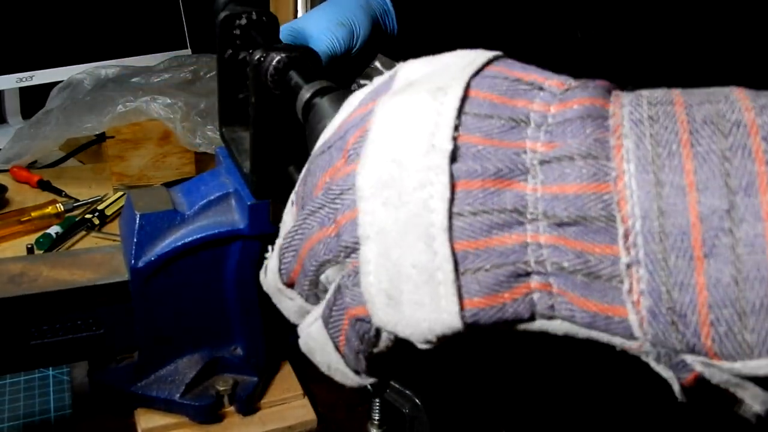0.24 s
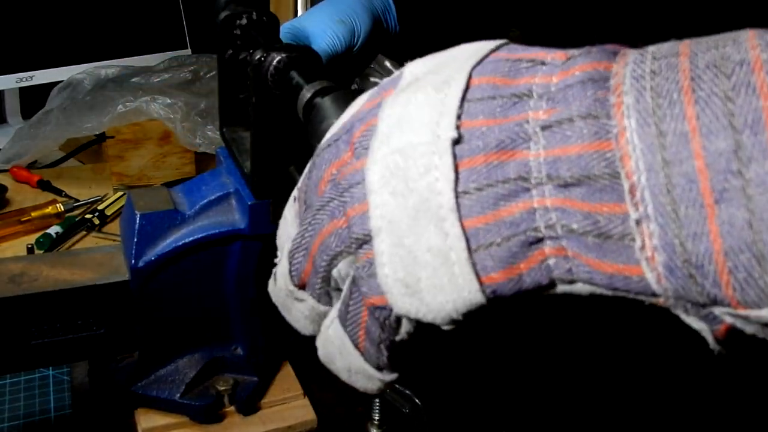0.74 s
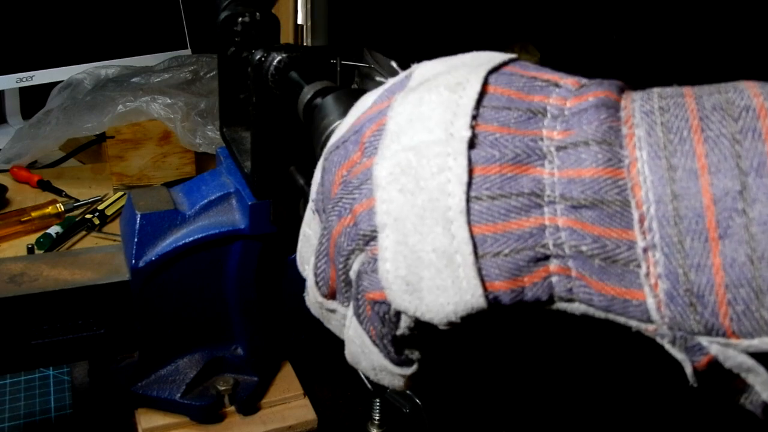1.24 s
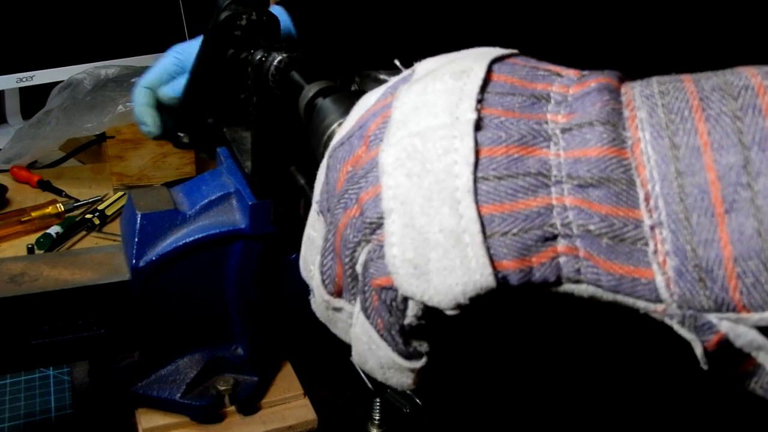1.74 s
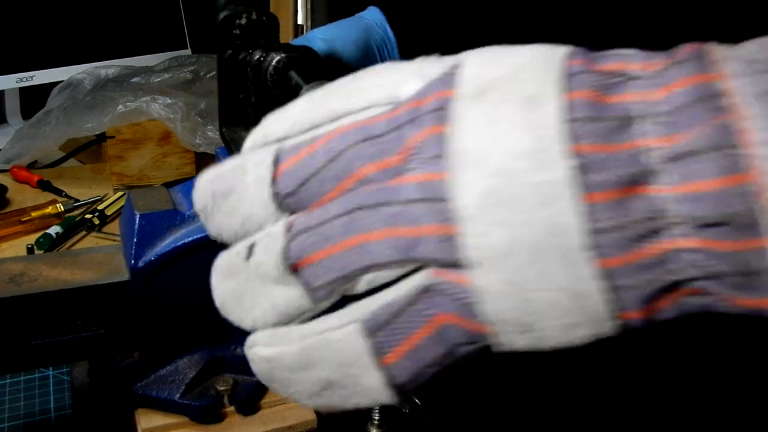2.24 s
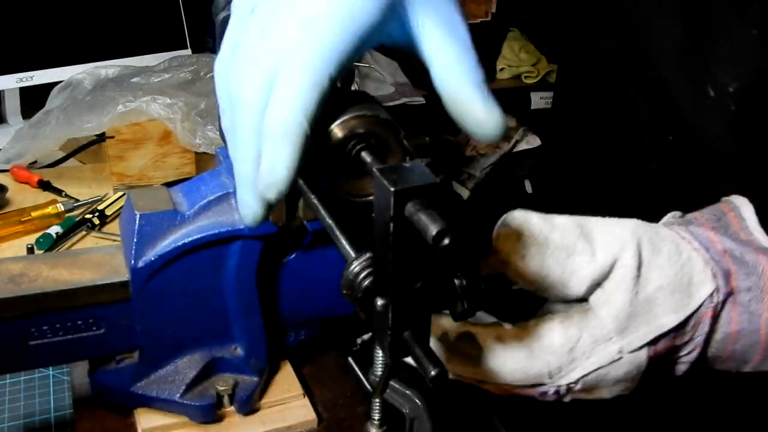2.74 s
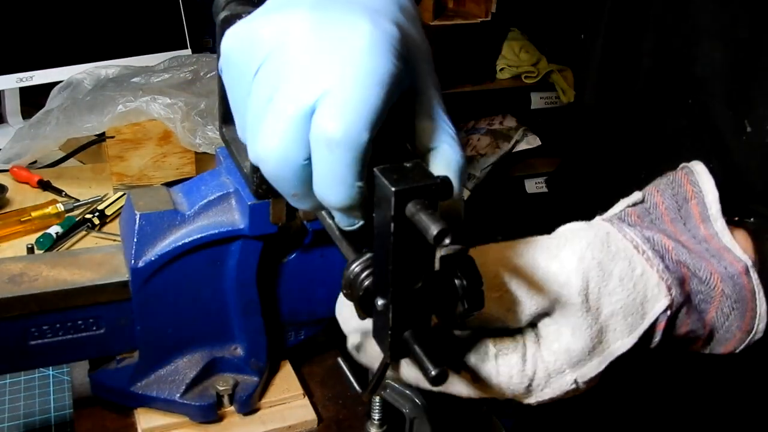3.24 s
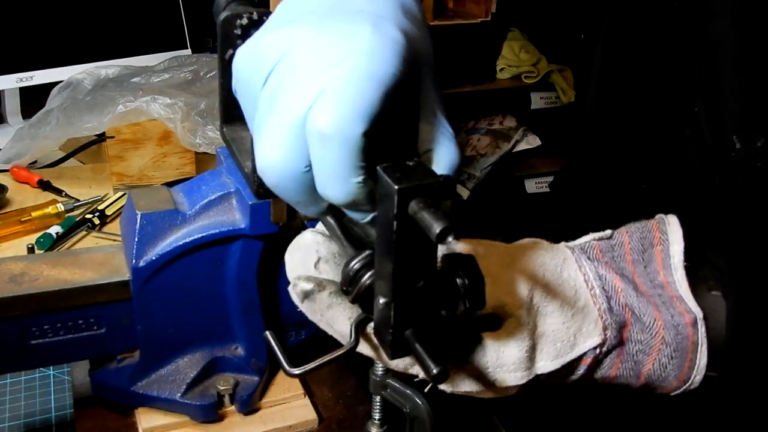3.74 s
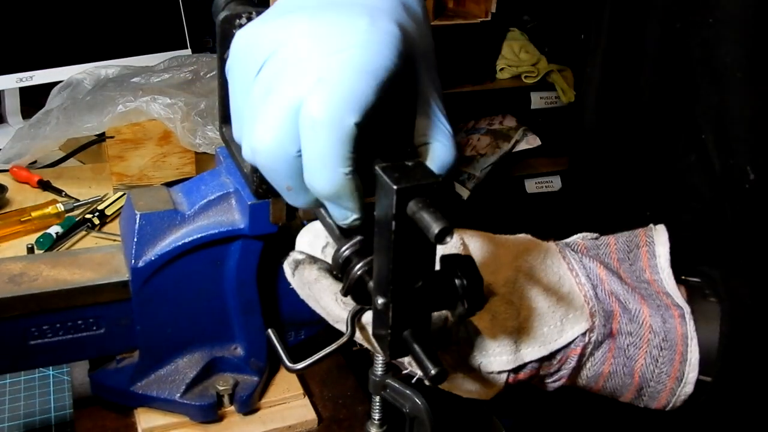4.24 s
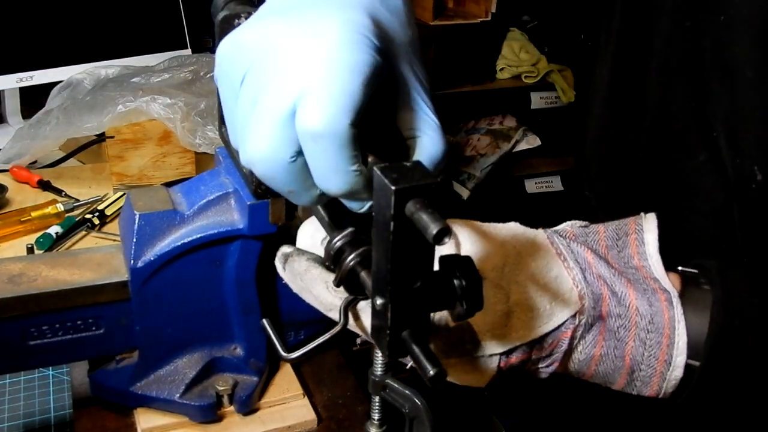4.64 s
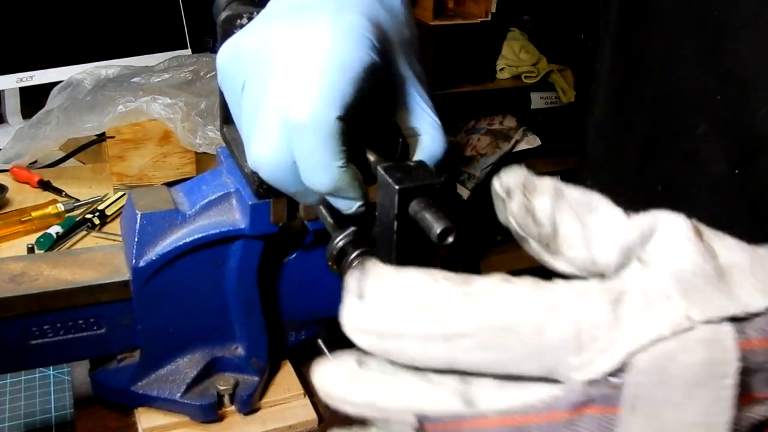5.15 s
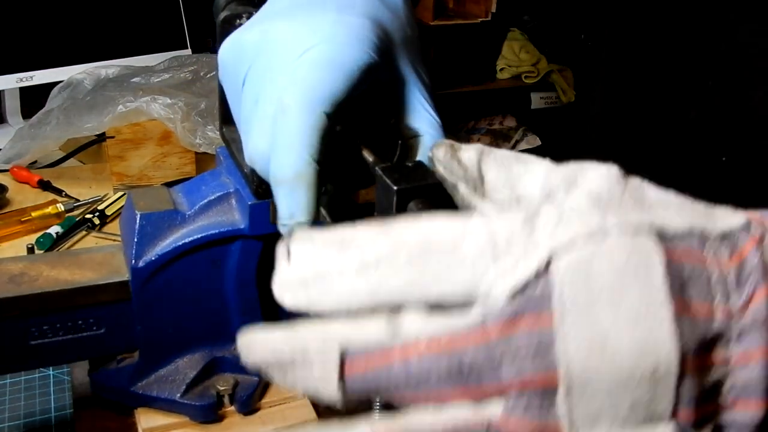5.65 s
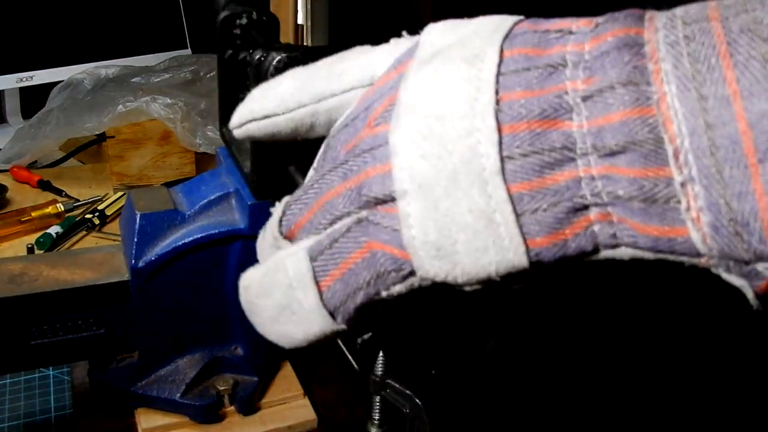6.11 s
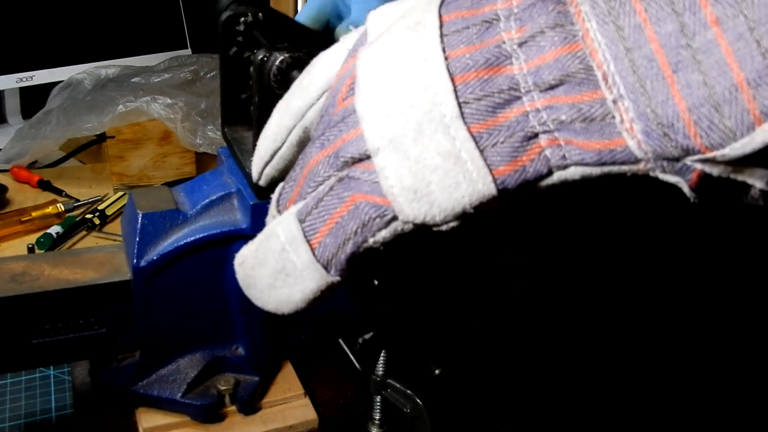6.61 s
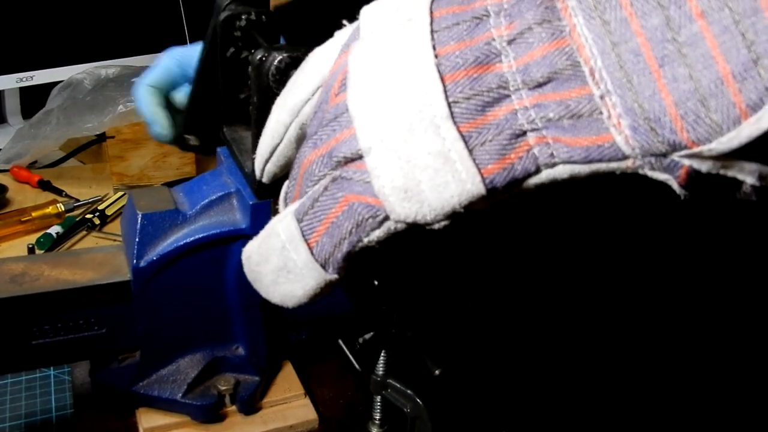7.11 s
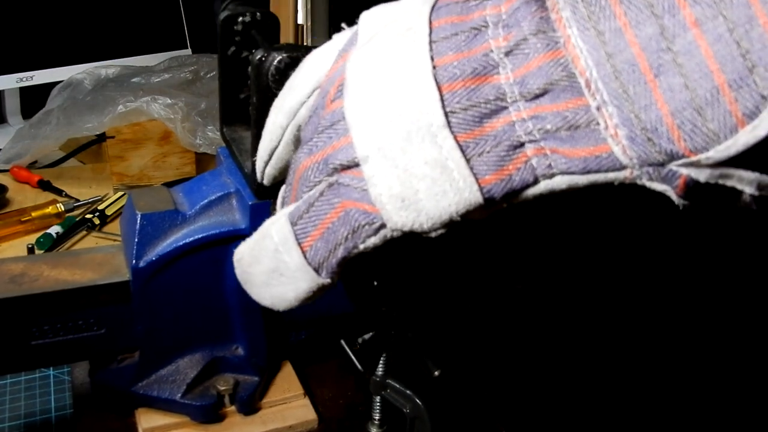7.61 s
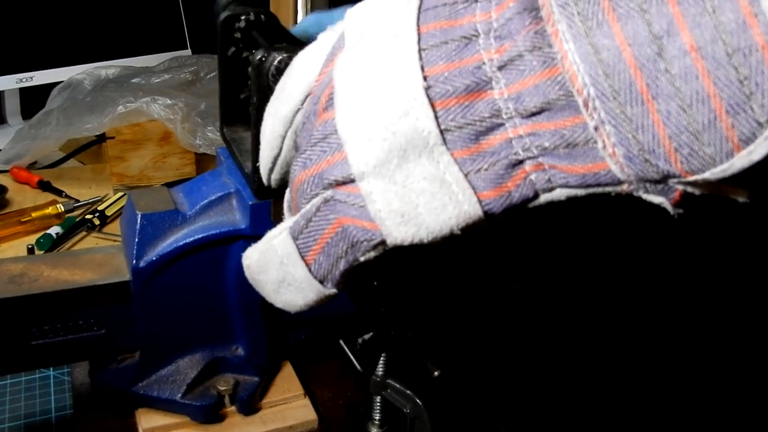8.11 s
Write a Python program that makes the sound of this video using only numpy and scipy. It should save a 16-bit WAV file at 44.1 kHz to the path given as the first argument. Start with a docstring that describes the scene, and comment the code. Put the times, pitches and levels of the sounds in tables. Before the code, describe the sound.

Close in a small workshop, a hand-cranked spring winder clicks through about ten steel ratchet teeth, then stops with a clack. Gloves rustle, loose parts tick and a shaft groans softly. A second, faster and louder run of clicks follows, broken by a hard metallic snap, then slower clicks and a final snap.

```python
"""A spring winder clamped to a workshop bench is cranked in two runs: its steel pawl scrapes, drops and chatters
from tooth to tooth (damped modes plus noise bursts), and three times the ratchet snaps hard (dense noise bursts).
Loose parts clack and tick, the bearing and twisted shaft groan, the clamp knocks, gloves rustle, the bench booms
(all shaped noise). The room is small, with air noise, hum and whine; sharp loud clicks pull the gain down, and
it slowly comes back."""
import sys
import numpy as np
from scipy import signal
from scipy.fft import rfft, irfft, next_fast_len
from scipy.io import wavfile
from scipy.ndimage import uniform_filter1d, minimum_filter1d, map_coordinates

SR = 44100
rng = np.random.default_rng(int(sys.argv[2]) if len(sys.argv) > 2 else 0)


def file_out(sig):
    """Save sig as 16-bit WAV at sys.argv[1]."""
    # one column per channel
    cols = np.atleast_2d(sig).T
    # limit, then scale
    lim = np.clip(cols, -1, 1)
    pcm = np.round(lim * 32767).astype(np.int16)
    wavfile.write(sys.argv[1], SR, pcm)


N = 369116
BLOW_T_S = np.arange(SR // 2) / SR  # time axis of one blow
BLOW_N = len(BLOW_T_S)

# Events; levels are relative, before the trims in each function.
# pawl drops into a tooth: [t/s, strength/dB]
PAWL_DROPS = [(1.2101, -24), (1.311, -20), (1.3847, -19.5), (1.459, -18), (1.5338, -16.5), (1.6226, -16.5),
              (1.726, -16.5), (1.8536, -18.5), (1.98, -19), (2.0925, -21.5), (6.767, -22.5),
              (6.8432, -20.5), (6.9213, -18.5), (6.986, -17.5), (7.0422, -12.5), (7.0912, -11),
              (7.1474, -12), (7.222, -15), (7.3147, -16.5), (7.4077, -16), (7.5188, -16), (7.6843, -26.5),
              (7.7647, -25), (7.8308, -21), (7.8935, -21), (7.968, -21.5), (8.0495, -20.5), (8.13, -22.5),
              (8.21, -21)]
# ratchet snaps home: [t/s, level/dB, bench knock/dB]
RATCHET_SNAPS = [(4.0061, -29.5, -52), (7.5512, -9.5, -30.5), (8.2527, -15.5, -44)]
# hands bump and shift the parts: [t/s, contact length/s, clack/dB, crack/dB, bench knock/dB]
PART_CONTACTS = [(0.03, 0.003, -40, -48, -71), (0.441, .001, -60, -67, -59), (0.664, 0.013, -42, -53, -42),
                 (0.719, 0.015, -38, -50, -45), (2.246, 0.0015, -38.5, -46.5, -61),
                 (2.276, 0.015, -26.5, -48, -31), (3.017, 0.0017, -53, -47.5, -55.5),
                 (3.1, 0.0023, -55.5, -70, -68), (3.265, .006, -48, -57, -50.5),
                 (3.356, 0.0033, -45.5, -54, -52), (3.388, 0.0033, -52, -58, -57),
                 (3.408, 0.0029, -42.5, -58, -52), (3.414, 0.013, -41, -49.5, -50),
                 (3.609, 0.0024, -55, -73, -56), (3.719, 0.014, -43.5, -63, -48.5),
                 (3.964, .0038, -44.5, -47, -48), (4.136, .03, -45.5, -46, -60),
                 (4.431, .07, -47.5, -50.5, -52), (4.512, 0.0019, -50.5, -41.5, -56),
                 (4.874, .014, -42, -68, -50.5), (5.366, 0.0029, -53, -72, -58),
                 (5.467, 0.0084, -49, -51.5, -57), (5.663, .005, -52, -62, -72),
                 (5.852, 0.0022, -56, -56, -68), (5.925, 0.016, -45.5, -39.5, -63),
                 (6.435, 0.0031, -40, -52, -48), (6.447, 0.0017, -40, -57, -47.5),
                 (7.607, 0.0025, -31.5, -31, -56)]
# clamp rocks against the bench: [t/s, level/dB]
CLAMP_KNOCKS = [(0.672, -49), (.72, -42), (2.278, -79), (3.723, -46.5)]
# shaft twisted in its seat: [start t/s, length/s, level/dB]
SHAFT_TWISTS = [(2.96, 0.028, -48.5), (3.35, 0.18, -51), (3.98, 0.21, -43), (4.44, 0.084, -46.5)]
# glove strokes the tool: [start t/s, length/s, level/dB]
GLOVE_STROKES = [(2.35, 0.052, -59), (2.7, .25, -60.5), (3.2, 0.59, -60), (4.8, 0.42, -65),
                 (5.45, 0.28, -62.5), (5.85, 0.19, -56)]
# hand pushes the crank round: [start t/s, length/s, groan level at the usual speed/dB]
CRANK_PUSHES = [(1.42, 0.52, -47.5), (6.82, .29, -40), (7.29, .17, -37), (7.85, 0.049, -43)]

# Modes and resonances.
# damped modes of pawl and wheel: [f/Hz, mean level/dB, t60/s]
WHEEL_MODES = [(2100, -9.5, 0.04), (2510, -15, 0.14), (3000, -28, 0.017), (3400, -6, 0.12),
               (3667, 1.5, 0.015), (4096, 1, 0.026), (4447, -3, 0.061), (5000, 3.5, 0.022),
               (5195, 2, 0.035), (5700, 0, 0.016), (6300, -6, 0.0083)]
# lightly damped steel frame and spring: [f/Hz, width/Hz, level/dB]
FRAME_RESONANCES = [(1918, 94, 6.5), (2153, 25, 10.5), (2660, 230, -53), (2650, 83, -3), (2685, 21, 3),
                    (3270, 76, -20), (3470, 36, 7), (3780, 29, -14), (4400, 20, -23), (4100, 63, 16),
                    (5080, 100, -14.5), (5650, 140, 6.5), (4870, 58, 5), (6050, 20, 1.5)]
# bench and its clamp: [f/Hz, width/Hz, level/dB]
BENCH_RESONANCES = [(227.7, 9.4, 7.5), (301, 28, -5.5), (402, 31, -15.5), (492, 60, -7.5), (610, 52, -15),
                    (1092, 36, -4.5)]
# hollow ring of the clamp, before squaring: [f/Hz, width/Hz, level/dB]
CLAMP_RESONANCES = [(970, 190, -6), (1012, 180, 3)]
# short ring of the loose parts, before squaring: [f/Hz, width/Hz, level/dB]
LOOSE_RESONANCES = [(2400, 170, -6.5), (3000, 760, 2.5)]

# Noise spectra.
# full clack of steel on steel: [f/Hz, level per Hz/dB]
CLACK_SPECTRUM = [(200, -54), (600, -7.5), (850, -32), (1450, -45), (1950, -19), (2500, 4.5), (3300, 0),
                  (4200, -1), (5200, 4.5), (6300, -12), (8000, -8), (16000, -32.5)]
# treble crack of steel on steel: [f/Hz, level per Hz/dB]
CRACK_SPECTRUM = [(2500, -75), (5500, 5.5), (7000, -0.5), (8500, -3.5), (9800, -0.5), (12500, -4.5),
                  (13800, -29), (16000, -53)]
# ratchet snap: [f/Hz, level per Hz/dB]
SNAP_SPECTRUM = [(50, -29), (200, -30), (550, -4), (850, -27), (1350, -78), (1900, 4.5), (2400, -20.5),
                 (2900, -5.5), (3500, 3.5), (5300, -4), (7300, -0.5), (9000, -2), (12500, -11),
                 (16000, -26)]
# bump or scrape of parts: [f/Hz, level per Hz/dB]
BUMP_SPECTRUM = [(30, -25), (90, -7), (170, 4.5), (300, -4.5), (800, -25), (1080, -32.5), (1450, -18.5),
                 (2100, 4.5), (3000, -2.5), (4000, 0.5), (5500, -5.5), (8000, -22), (16000, -70)]
# groan of the twisted shaft: [f/Hz, level per Hz/dB]
GROAN_SPECTRUM = [(150, -44), (230, 2.5), (330, -11), (430, 2.5), (540, 5.5), (630, -4.5), (760, -15.5),
                  (1500, -34)]
# glove rustle: [f/Hz, level per Hz/dB]
RUSTLE_SPECTRUM = [(600, 8), (1400, -2.5), (2300, 5), (5000, 0), (9000, -2.5), (12000, -23), (16000, -12)]
# low rumble of the shaken bench: [f/Hz, level per Hz/dB]
RUMBLE_SPECTRUM = [(20, -11), (50, -8), (80, -2.5), (130, -1), (200, 1), (300, -4.5), (500, -18.5),
                   (800, -31), (2000, -73)]
# room noise: [f/Hz, level per Hz/dB]
AIR_SPECTRUM = [(20, -29), (80, -10), (200, -24.5), (450, -1.5), (650, -9.5), (1000, -10.5), (1350, -21),
                (2200, -13.5), (3400, -19), (6000, -22), (10000, -30), (14000, -33), (16000, -49)]

# Room and stereo.
# left-right correlation of the noises: [f/Hz, correlation]
STEREO_LIKENESS = [(40, 0.098), (130, 0.76), (300, 0.72), (3000, 0.93), (6800, 0.73), (10000, 0.4),
                   (15000, 0.1)]
# decay of the room: [f/Hz, t60/s]
ROOM_DECAY = [(200, 0.4), (1400, 0.27), (3700, 0.25), (9700, 0.24), (16000, 0.2)]
# stereo balance: [f/Hz, left minus right/dB]
STEREO_BALANCE = [(100, 0.5), (4400, 0.4), (8100, 2), (15000, 2)]

USUAL_TEETH_PER_S = 11  # crank speed
BEARING_HZ, PITCH_POWER = 366, .5  # groan pitch at the usual speed; exponent of its rise with speed
GROWTH_DB_PER_DOUBLING = 9  # groan level against crank speed
WEAKEST_DROP_DB, CRACK_GROWTH_DB_PER_DB = -26.5, 0.12  # extra crack per dB of strength above the weakest drop
TOP_HZ = 15900


def amp(db):
    """Decibels to gain."""
    return 10 ** (np.asarray(db) / 20)


def unit(x):
    """Scale to rms 1."""
    return x / np.sqrt(np.mean(x ** 2) + 1e-20)


def blow(x):
    """Scale to the energy of 10 ms at rms 1."""
    return unit(x) * np.sqrt(SR / 100 / x.shape[-1])


def along(points, hz):
    """Interpolate [f/Hz, value] points on a log frequency axis."""
    f, value = np.transpose(points)
    return np.interp(np.log(hz + 1), np.log(f + 1), value)


def wobble(knots_per_s):
    """Smooth random curve: a spline through random knots."""
    knots = rng.standard_normal(int(N * knots_per_s / SR) + 4)
    return map_coordinates(knots, [np.arange(N) * knots_per_s / SR])


def dying(t60_s):
    """Exponential decay of 60 dB in t60_s."""
    return np.exp(-np.log(1000) * BLOW_T_S / t60_s)


def shape(points):
    """Gain against frequency from [f/Hz, dB] points."""
    return lambda hz: amp(along(points, hz))


def resonant(peaks):
    """Gain against frequency of damped resonances, summed in power."""
    def colour(hz):
        power = 0
        for centre_hz, width_hz, db in peaks:
            damping = (hz * width_hz) ** 2
            power = power + amp(2 * db) * damping / ((centre_hz ** 2 - hz ** 2) ** 2 + damping)
        return np.sqrt(power)
    return colour


def noise(colour, size=BLOW_N):
    """Coloured stereo noise of rms 1; mid and side shares set the left-right correlation."""
    m = next_fast_len(size)
    hz = np.fft.rfftfreq(m, 1 / SR)
    turn = np.arccos(np.clip(along(STEREO_LIKENESS, hz), -1, 1)) / 2
    spectrum = rfft(rng.standard_normal((2, m))) * colour(hz)
    mid, side = irfft(spectrum * [np.cos(turn), np.sin(turn)], m)[:, :size]
    return unit(np.array([mid + side, mid - side]))


def ring(modes):
    """Sum of damped sine modes, with random phases and slightly new strengths at each strike."""
    total = np.zeros(BLOW_N)
    for hz, db, t60_s in modes:
        strength = amp(db + 2 * rng.normal())
        total += strength * dying(t60_s) * np.sin(2 * np.pi * (hz * BLOW_T_S + rng.random()))
    return total


def chatter(x, length_s, count=5):
    """Steel does not land once: it touches several times within length_s, with random polarity."""
    delays_s = (np.arange(count) + rng.random(count)) / count * length_s
    signs = rng.choice([-1, 1], count)
    total = np.zeros_like(x)
    for delay_s, sign in zip(delays_s, signs):
        cut = x * (BLOW_T_S < BLOW_T_S[-1] - delay_s)  # nothing wraps round
        total += sign * np.roll(cut, round(delay_s * SR), axis=-1)
    return total


def touch(points, length_s):
    """A run of sharp little impacts, more of them the longer the contact lasts."""
    impact = noise(shape(points)) * dying(t60_s=.014)
    return blow(chatter(impact, length_s, count=3 + round(length_s / .002)))


def small_part(x, corner_hz=1700):
    """A small steel part radiates little below its corner frequency."""
    return signal.sosfilt(signal.butter(N=2, Wn=corner_hz, btype="high", fs=SR, output="sos"), x)


def with_room(x, wet_db, rise_s=0.0038):
    """Add the room's answer: it gathers from all sides, so its colour is smooth; treble dies first."""
    power = uniform_filter1d(np.mean(abs(rfft(x)) ** 2, axis=0), size=260)
    colour = lambda hz: np.sqrt(abs(np.interp(hz, np.fft.rfftfreq(BLOW_N, 1 / SR), power)))
    hz, t_s, z = signal.stft(noise(colour), SR, nperseg=256)
    decay = np.exp(-np.log(1000) * t_s / along(ROOM_DECAY, hz)[:, None])
    tail = signal.istft(z * decay, SR, nperseg=256)[1][:, :BLOW_N]
    tail = tail * (1 - np.exp(-BLOW_T_S / rise_s))
    return x + amp(wet_db) * tail * np.linalg.norm(x) / np.linalg.norm(tail)


def add(track, t_s, x):
    """Mix x into the track at t_s."""
    part = track[:, max(round(t_s * SR), 0):][:, :x.shape[-1]]
    part += x[:, :part.shape[1]]


def moves(rows, attack_s, release_s, swell_db=0):
    """Gain of hand moves: 20 dB up per attack_s, a hold that swells to its level, 20 dB down per release_s."""
    t_s, gain = np.arange(N) / SR, np.zeros(N)
    for start_s, length_s, db in rows:
        before = np.maximum(start_s - t_s, 0) / attack_s
        after = np.maximum(t_s - start_s - length_s, 0) / release_s
        swell = swell_db * (np.clip((t_s - start_s) / length_s, 0, 1) - 1)
        gain += amp(db + swell - 20 * np.minimum(before + after, 10))
    return gain


def background(air_db=-59, hum_db=-66, whine_db=-81):
    """Room noise with a low hum and a thin electronic whine, both narrow bands of noise."""
    air = amp(air_db) * noise(shape(AIR_SPECTRUM), size=N)
    hum = amp(hum_db) * noise(resonant([(250, 30, 0)]), size=N)
    whine = amp(whine_db) * noise(resonant([(11520, 100, 0)]), size=N)
    return air + hum + whine


def bench(t60_s=0.32, rise_s=0.0018, soft_hz=1200, low_hz=160):
    """The heavy bench takes up a blow slowly and booms on; it radiates neither treble nor deep bass."""
    def colour(hz):
        treble_loss = 1 + (hz / soft_hz) ** 10
        bass_loss = 1 + (low_hz / (hz + 1)) ** 4
        return resonant(BENCH_RESONANCES)(hz) / treble_loss / bass_loss
    return noise(colour) * dying(t60_s) * (1 - np.exp(-BLOW_T_S / rise_s))


def frame(t60_s=0.3):
    """The many close modes of frame and spring blur into a short steel shimmer."""
    return blow(noise(resonant(FRAME_RESONANCES)) * dying(t60_s))


def handling(groan_db=-2, scrape_db=-15, shake_db=-10, rustle_db=-1.5, rumble_db=-57):
    """The twisted shaft groans, scrapes and shakes the bench; gloves rustle in uneven grains over a low rumble."""
    grain = lambda: amp(3 * wobble(300) + 2 * wobble(30))
    groan = amp(groan_db + 1.7 * wobble(40)) * noise(shape(GROAN_SPECTRUM), size=N)
    scrape = amp(scrape_db) * grain() * noise(shape(BUMP_SPECTRUM), size=N)
    twist = moves(SHAFT_TWISTS, attack_s=0.021, release_s=0.069, swell_db=3) * (groan + scrape)
    stroke = amp(rustle_db) * moves(GLOVE_STROKES, attack_s=0.14, release_s=0.32)
    rustle = stroke * grain() * noise(shape(RUSTLE_SPECTRUM), size=N)
    shake = amp(rumble_db) + amp(shake_db) * moves(SHAFT_TWISTS, attack_s=0.025, release_s=0.24)
    rumble = shake * amp(1.2 * wobble(9.2)) * noise(shape(RUMBLE_SPECTRUM), size=N)
    return twist + rustle + rumble


def clamp(t60_s=0.28):
    """The clamp rocks against the bench with a hollow ring near 1 kHz."""
    track = np.zeros((2, N))
    colour = lambda hz: resonant(CLAMP_RESONANCES)(hz) ** 2
    for t_s, db in CLAMP_KNOCKS:
        add(track, t_s, amp(db) * blow(noise(colour) * dying(t60_s)))
    return track


def ticks(tick_db=-58, spread_db=2, crack_db=-7, count=14):
    """Loose parts tick faintly at chance moments."""
    track = np.zeros((2, N))
    for when in rng.random(count):
        bump = touch(BUMP_SPECTRUM, length_s=0.0034)
        crack = amp(crack_db) * touch(CRACK_SPECTRUM, length_s=0.0015)
        add(track, when * N / SR, amp(tick_db + spread_db * rng.normal()) * (bump + crack))
    return track


def contacts(bump_db=-1.5, crack_db=-2, loose_db=-5, frame_db=-14, bench_db=1):
    """Quick runs of sharp little touches of the loose parts, which ring at 2.4 to 3 kHz; frame and bench answer."""
    track = np.zeros((2, N))
    loose_colour = lambda hz: resonant(LOOSE_RESONANCES)(hz) ** 2
    for t_s, length_s, clack_level_db, crack_level_db, knock_db in PART_CONTACTS:
        bump = amp(clack_level_db + bump_db) * with_room(touch(BUMP_SPECTRUM, length_s), wet_db=-1)
        crack = amp(crack_level_db + crack_db) * with_room(touch(CRACK_SPECTRUM, length_s), wet_db=-6)
        loose = amp(loose_db) * blow(noise(loose_colour) * dying(t60_s=0.27))
        ringing = amp(clack_level_db) * (loose + amp(frame_db) * frame())
        boom = amp(knock_db + bench_db) * bench()
        add(track, t_s, bump + crack + ringing + boom)
    return track


def bearing(core_knots_per_s=130, skirt_knots_per_s=420, skirt_db=0, uneven_db=4):
    """Uneven friction makes a noise band with a rough skirt, higher and louder the faster the teeth pass."""
    drops_s = np.array(PAWL_DROPS)[:, 0]
    midpoints_s = (drops_s[1:] + drops_s[:-1]) / 2
    teeth_per_s = np.interp(np.arange(N) / SR, midpoints_s, 1 / np.diff(drops_s))
    speed = teeth_per_s / USUAL_TEETH_PER_S
    phase = 2 * np.pi * np.cumsum(BEARING_HZ * speed ** PITCH_POWER) / SR
    band = lambda rate: wobble(rate) * np.cos(phase) + wobble(rate) * np.sin(phase)
    groan = band(core_knots_per_s) + amp(skirt_db) * band(skirt_knots_per_s)
    groan = unit(groan * amp(uneven_db * wobble(45)))
    push = moves(CRANK_PUSHES, attack_s=.06, release_s=0.085, swell_db=0.5)
    return push * amp(GROWTH_DB_PER_DOUBLING * np.log2(speed)) * groan


def snaps(force_db=5, frame_db=-15, bench_db=2):
    """The ratchet snaps home: seven hard, dry contacts within 2.8 ms; frame and bench ring."""
    track = np.zeros((2, N))
    for t_s, db, knock_db in RATCHET_SNAPS:
        contact = noise(shape(SNAP_SPECTRUM)) * dying(t60_s=0.0066)
        burst = blow(chatter(contact, length_s=.0028, count=7))
        steel = with_room(burst, wet_db=-8) + amp(frame_db) * frame()
        add(track, t_s, amp(db + force_db) * steel + amp(knock_db + bench_db) * bench())
    return track


def pawl(ring_db=-1, clack_db=-3, crack_db=-7, frame_db=-8, bench_db=-19,
         bounce_db=-9, slide_db=-22, tip_db=-18):
    """The pawl scrapes up a tooth, ticks over its tip, drops, chatters and bounces; hard drops crack more."""
    track = np.zeros((2, N))
    clack_noise = lambda t60_s: noise(shape(CLACK_SPECTRUM)) * dying(t60_s)
    for t_s, db in PAWL_DROPS:
        slide = amp(slide_db) * noise(shape(BUMP_SPECTRUM)) * dying(t60_s=0.13)[::-1]  # swells until the drop
        tip = amp(tip_db) * blow(clack_noise(0.036))
        wheel = amp(ring_db) * blow(small_part(chatter(ring(WHEEL_MODES), length_s=.0018)))
        clack = amp(clack_db) * blow(chatter(clack_noise(0.043), length_s=.0014))
        crack_noise = noise(shape(CRACK_SPECTRUM)) * dying(t60_s=0.017)
        crack_gain = amp(crack_db + CRACK_GROWTH_DB_PER_DB * (db - WEAKEST_DROP_DB))
        crack = crack_gain * blow(chatter(crack_noise, length_s=0.0014))
        bounce = amp(bounce_db) * blow(chatter(clack_noise(0.04), length_s=0.0018))
        click = with_room(wheel + clack, wet_db=-5.5) + with_room(crack, wet_db=-7)
        ringing = amp(frame_db) * frame() + amp(bench_db) * bench()
        add(track, t_s - BLOW_N / SR, amp(db) * slide)
        add(track, t_s - rng.uniform(0.0014, 0.0065), amp(db) * tip)
        add(track, t_s, amp(db) * (click + ringing))
        add(track, t_s + rng.uniform(.003, .008), amp(db) * bounce)
    return track


def scene():
    """The room, the hands and the winder."""
    surroundings = background() + handling() + clamp()
    loose_parts = ticks() + contacts()
    winder = bearing() + snaps() + pawl()
    return surroundings + loose_parts + winder


def gain_control(x, threshold_db=-21, slope=0.85, release_db_per_s=10, lag_s=0.0028):
    """Sharp, loud sounds pull the gain down just after they start; it recovers at a steady rate in dB."""
    edge = np.diff(x.mean(0), prepend=0) ** 2  # differencing favours treble
    power = signal.lfilter(np.ones(132) / 132, 1, edge)  # 3 ms mean
    excess_db = slope * np.maximum(10 * np.log10(power + 1e-12) - threshold_db, 0)
    t_s = np.arange(N) / SR
    recovery_db = release_db_per_s * t_s
    held_db = np.maximum.accumulate(excess_db + recovery_db) - recovery_db
    return x * amp(-np.interp(t_s - lag_s, t_s, held_db))


def limiter(x, ceiling=.72):
    """The gain ducks for a moment around any peak above the ceiling."""
    needed = ceiling / np.maximum(abs(x).max(axis=0), ceiling)
    lowest = minimum_filter1d(needed, size=89)
    return x * uniform_filter1d(uniform_filter1d(lowest, size=45), size=45)


def record(dry):
    """Gain control, peak limiter, a left side brighter than the right, and the band limit."""
    x = limiter(gain_control(dry))
    m = next_fast_len(N + SR // 2)
    hz = np.fft.rfftfreq(m, 1 / SR)
    balance = amp(np.outer([.5, -.5], along(STEREO_BALANCE, hz)))
    return irfft(rfft(x, m) * balance * (hz < TOP_HZ), m)[:, :N]


dry = scene()
out = record(dry)
file_out(out)
```